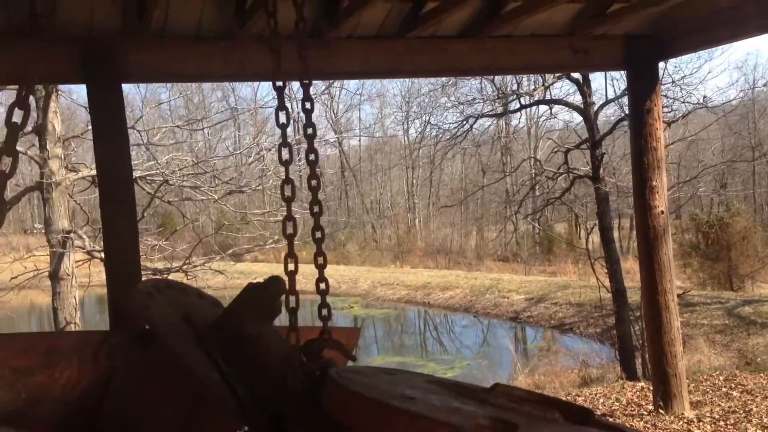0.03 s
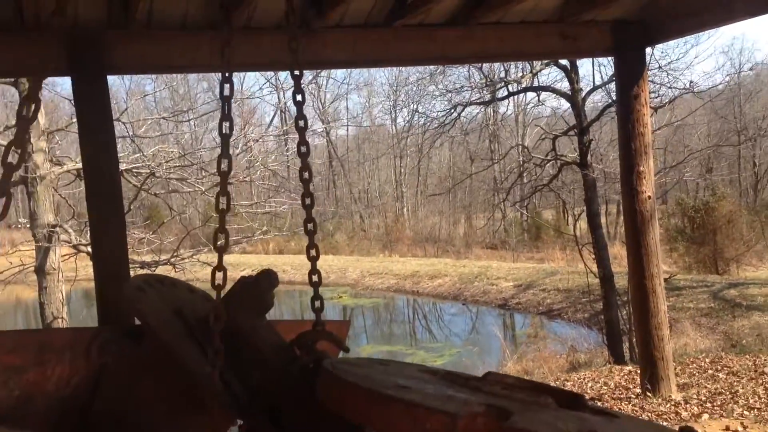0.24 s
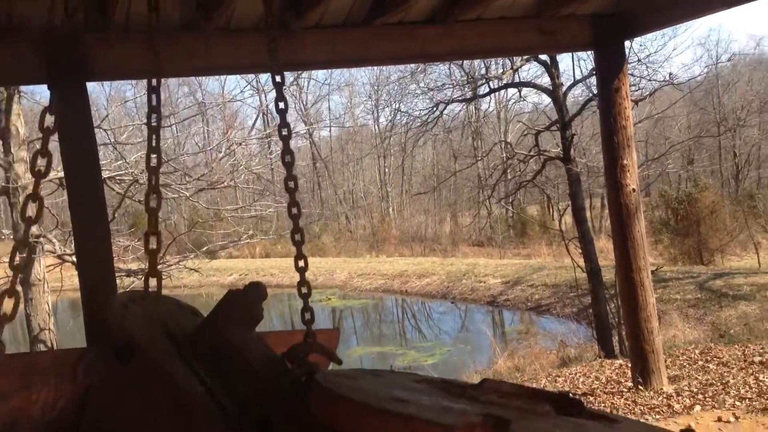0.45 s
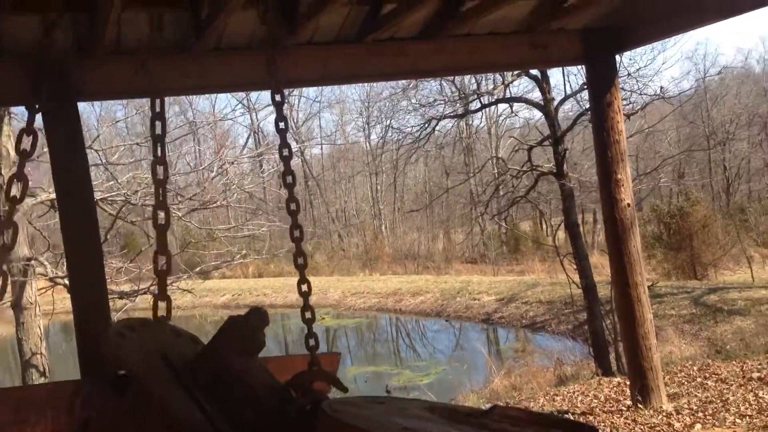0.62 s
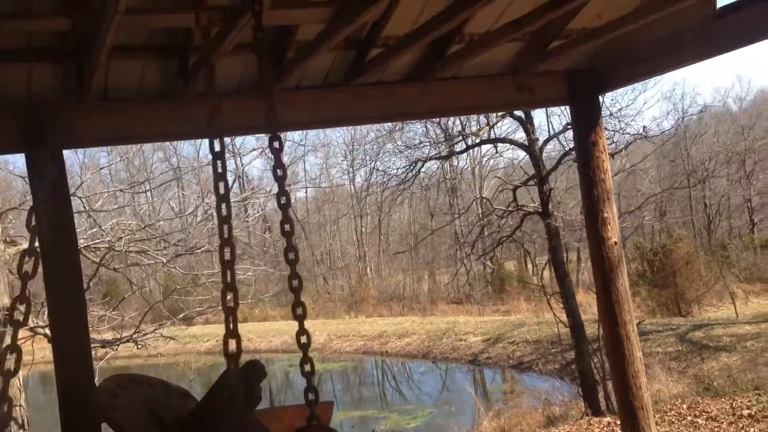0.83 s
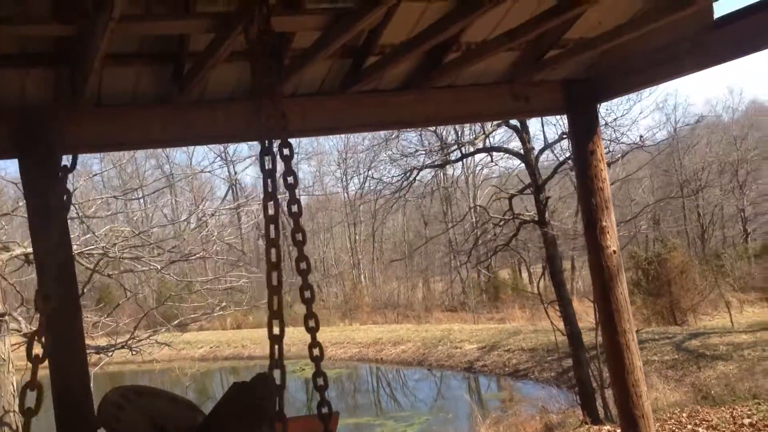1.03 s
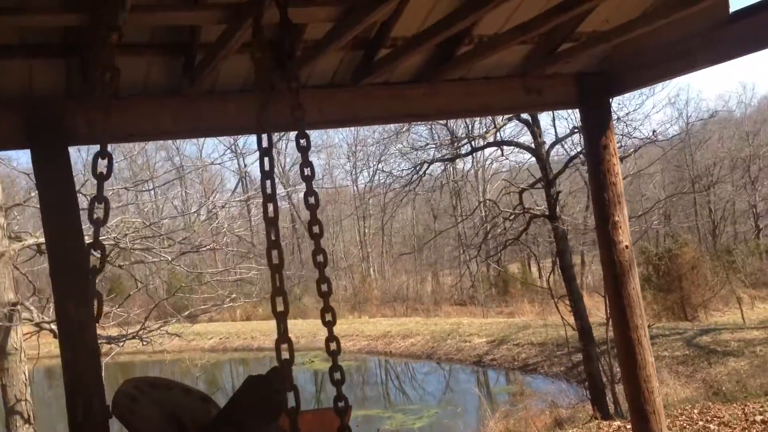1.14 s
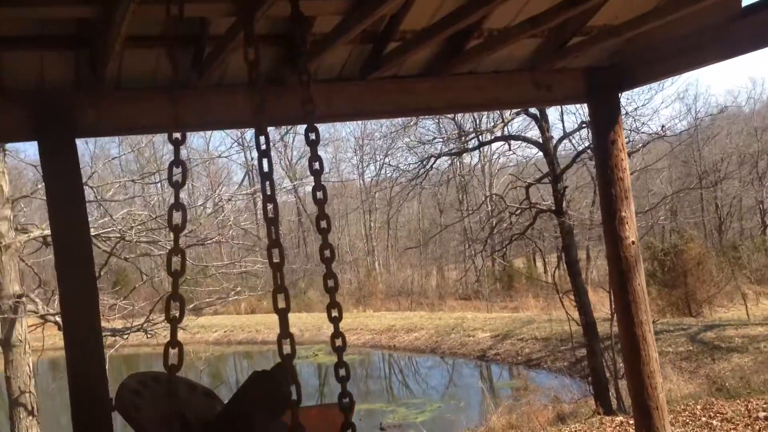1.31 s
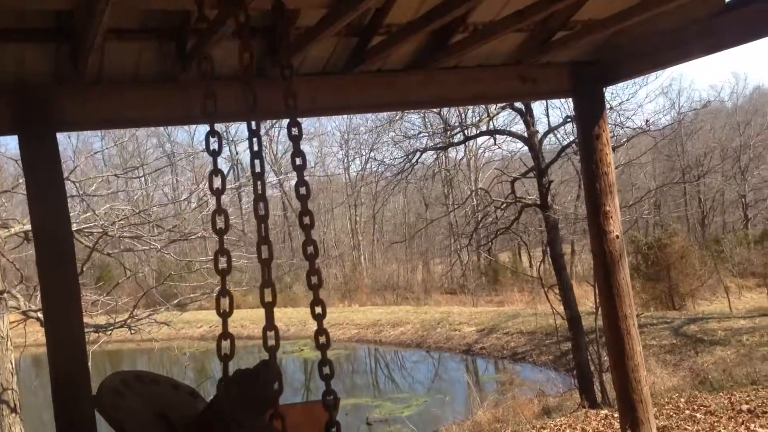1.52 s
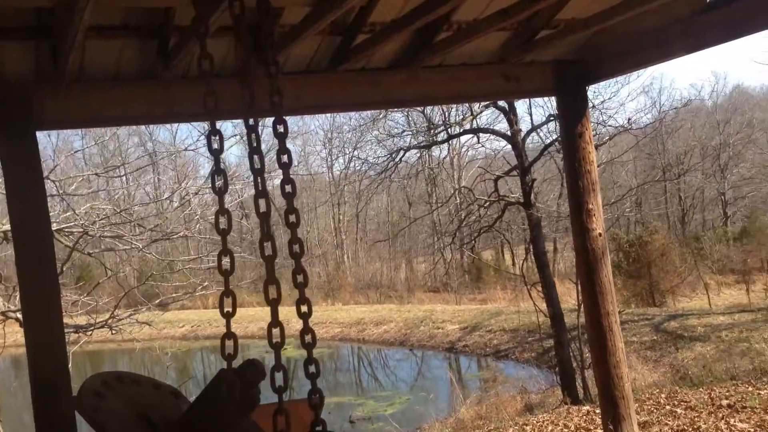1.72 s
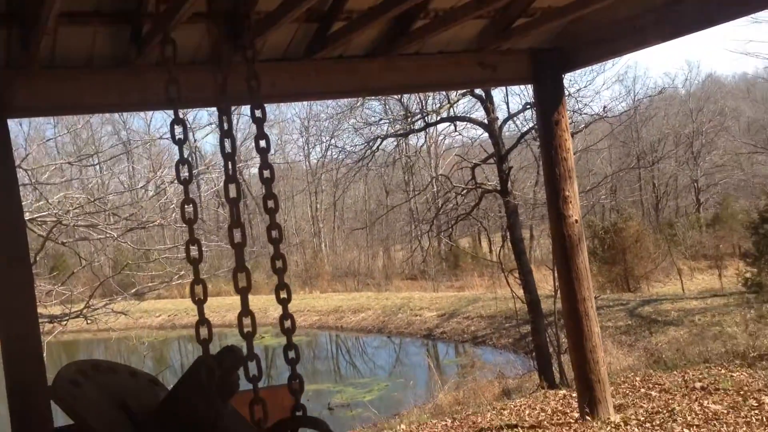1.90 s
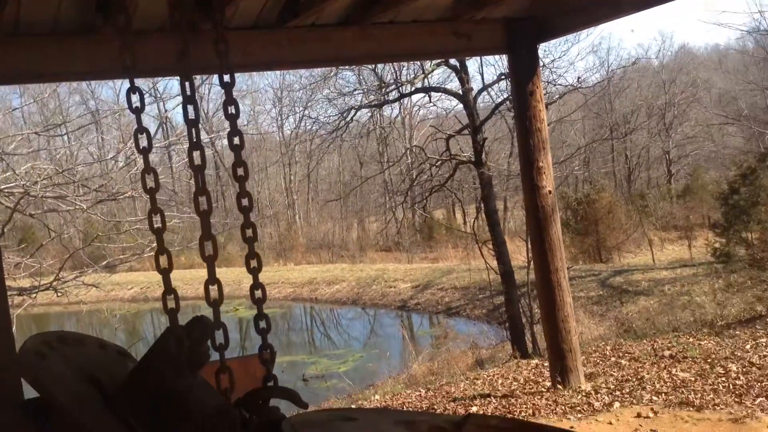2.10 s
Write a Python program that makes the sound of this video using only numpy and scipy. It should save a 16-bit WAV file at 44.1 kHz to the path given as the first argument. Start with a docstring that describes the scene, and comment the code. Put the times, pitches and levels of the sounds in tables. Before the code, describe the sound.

A hand chain winch is pulled once: steel links rattle fast and bright with gritty crackle and hollow clunks, one hard clunk ends it, then sparse dry clacks. Close, mono, under an open shed with short reverberation.

```python
"""A hand chain winch lowers a heavy blade under an open shed, over a low rumble and quiet air.
One quick pull: links rattle and click (ringing modes plus dense noise, spread by chattering
contacts), grit crackles and the loaded mechanism clunks, while the hanging load rumbles on.
As it settles, a dull thump (short sine pulses) is followed by dry clacks of the pawl and a soft scrape.
The shed answers the metal with a decaying wash of noise."""
import sys
import numpy as np
from scipy import signal
from scipy.fft import rfft, irfft, next_fast_len
from scipy.io import wavfile
from scipy.ndimage import uniform_filter1d

SR = 44100
rng = np.random.default_rng(int(sys.argv[2]) if len(sys.argv) > 2 else 0)


def to_wav(sig):
    """Store sig (one row per channel, or 1-D mono) as 16-bit WAV at the path in sys.argv[1].

    Samples outside -1..1 are clipped; the rate is SR.
    """
    pcm = np.clip(np.atleast_2d(sig), -1, 1) * 32767
    pcm = np.round(pcm).astype(np.int16)
    wavfile.write(sys.argv[1], SR, pcm.T)  # frames by channels


N = 94815
T = np.arange(N) / SR

# Spectrum of the quiet outdoor air: frequency_hz, level_db
AIR_SPECTRUM = [(30, -6), (200, -5), (500, -10.5), (1200, -13.5), (4000, -11), (9000, -15), (15000, -17.5)]
AIR_DB = -64.5

# Rumble of the hanging load: time_s, deep_bass_level_db, upper_bass_level_db
RUMBLE_LEVELS = [(0, -66, -38), (.08, -61, -84), (0.109, -64, -53), (.21, -50, -83), (0.249, -34.5, -38.5),
                 (.3, -35.5, -32), (.35, -46, -43), (0.379, -30.5, -42), (.42, -40.5, -49), (.6, -43, -38),
                 (.78, -59, -33.5), (.87, -49, -39), (1.02, -46.5, -39.5), (1.199, -50.5, -41.5),
                 (1.352, -54, -48.5), (1.551, -52, -58), (1.62, -65, -58.5), (1.78, -59.5, -63),
                 (1.83, -46.5, -56), (1.92, -61, -69), (2.15, -51, -62.5)]
# Spectrum of the deep bass: frequency_hz, level_db
DEEP_SPECTRUM = [(20, -26.5), (40, -8.5), (65, 2.5), (95, -2.5), (140, -17.5), (300, -44)]
# Spectrum of the upper bass: frequency_hz, level_db
UPPER_SPECTRUM = [(60, -20), (120, 4), (170, 1), (230, -8), (380, -14), (600, -29), (1200, -35.5),
                  (4000, -62)]

# Running chain between the strikes: time_s, level_db
RUN_LEVELS = [(0, -51.5), (.06, -79), (.11, -72), (.2, -77.5), (.26, -44), (.31, -42.5), (.37, -38),
              (.55, -32.5), (.64, -36.5), (.71, -35.5), (.75, -39.5), (.92, -41.5), (.99, -46.5),
              (1.03, -55.5), (1.085, -44), (1.115, -59.5), (1.24, -76)]
RUN_PER_S, RUN_TILT_DB_PER_OCTAVE, RUN_SPREAD_DB = 640, -1.3, 5
RUN_LINKS = 4  # different links that share the jingles

# Dull low pulses: centre_s, level_db, pitch_hz, length_s
THUMPS = [(.003, -29, 105, .0035), (.9625, -26, 300, .0011), (.9625, -24, 85, .004)]

# Links striking the wheel: start_s, level_db, chatter_s, brightness_db_per_octave
LINK_STRIKES = [(.022, -53, 0.011, -5.5), (0.0409, -48, 0.0038, -8), (0.21, -49, 0.009, -1.5),
                (0.216, -41, 0.015, -6.5), (0.236, -28, 0.0066, -5), (0.242, -27, 0.0054, 8),
                (0.314, -36.5, 0.0077, -3), (.336, -22.5, 0.01, -6), (0.348, -19, 0.0048, 2.5),
                (0.401, -23.5, 0.0089, 5), (0.4142, -15, 0.003, 1), (.439, -29, 0.0014, 9.5),
                (0.461, -23.5, 0.0033, 2.5), (0.4683, -16, 0.0025, 1), (.495, -26, 0.0086, 4.5),
                (0.505, -21, 0.015, 4.5), (.5235, -16.5, 0.0013, 2), (0.559, -25, 0.0047, 5),
                (0.574, -20, 0.01, -4.5), (0.5903, -17, 0.0013, 1.5), (.65, -30.5, 0.009, 0.5),
                (0.669, -21.5, 0.0054, 5), (0.69, -24.5, 0.0031, 6), (0.764, -28, 0.018, -3.5),
                (.86, -32.5, 0.0066, -0.5), (.881, -35, 0.0043, -9), (.894, -34, 0.0018, -5),
                (.936, -38, 0.0081, -16.5), (0.953, -34, 0.0062, 5.5), (0.969, -39, 0.0032, -3.5),
                (1.056, -42, .004, -5), (1.073, -50, 0.0051, -7), (1.082, -43, 0.0048, -9.5),
                (1.17, -47.5, 0.0031, -7.5)]
# Modes of the links: frequency_hz, level_db, t60_s
LINK_MODES = [(2800, -11, .06), (3010, -15, .06), (3440, -4, .08), (3535, -2, .08), (3690, -6, .075),
              (3895, -2, .08), (3975, -1, .07), (4490, 1, .07), (5190, -7, .07), (5890, -11, .08),
              (6310, -12, .08), (6715, -3, .07), (7140, -12, .08), (7980, -7, .07), (8350, -18, .06),
              (9490, -20, .055), (10750, -18, .04), (12150, -24, .05)]
# Spectrum of the links' contact noise: frequency_hz, level_db
LINK_CRACK_SPECTRUM = [(300, -37), (1000, -19), (2200, -6), (2800, -1.5), (3150, -3.5), (3600, 7.5),
                       (4700, -5), (7800, -8.5), (9000, -18.5), (11000, -26), (15000, -33.5)]
LINK_CRACK_DB, LINK_CRACK_T60_S = -3.5, 0.078
LINK_DETUNE, LINK_SCATTER_DB = 0.005, 4  # detune as a fraction of the frequency

# Links that ring on mostly in one mode: start_s, level_db, chatter_s, pitch_hz
LINK_PINGS = [(.038, -48.5, 0.0044, 3980), (.86, -29.5, 0.0095, 4477), (.862, -31, .005, 3460),
              (.94, -38.5, 0.01, 3470), (.972, -44, .008, 3930), (1.057, -37.5, 0.0068, 3390),
              (1.08, -38.5, .005, 3440)]
PING_T60_S = 0.05

# Fine crackle of grit between the links: start_s, length_s, level_db
GRIT_CLUSTERS = [(0.241, .012, -39), (0.25, 0.034, -32.5), (0.364, 0.073, -31), (0.427, 0.013, -33),
                 (0.495, 0.0054, -40), (1.985, 0.0041, -57.5), (2.005, 0.011, -49)]
# Spectrum of the grit: frequency_hz, level_db
GRIT_SPECTRUM = [(1000, -26), (3500, 0), (6000, 3), (10000, -5), (15000, -9.5)]
GRIT_PER_S, GRIT_SPREAD_DB = 830, 6

# Blows on the winch body: start_s, level_db, chatter_s, brightness_db_per_octave
BODY_BLOWS = [(.242, -18, 0.0053, -1), (.350, -24, 0.0052, -1), (.366, -21, 0.014, -2.5),
              (.418, -21.5, 0.017, -5), (.436, -23, 0.016, -4), (.49, -30.5, 0.015, -5.5),
              (.545, -20, 0.0046, -5), (.562, -21.5, 0.011, -6.5), (.583, -21.5, 0.015, -1),
              (0.7834, -11.5, 0.0034, 1.5), (.797, -21.5, 0.0032, -1), (.802, -20.5, 0.0025, -2.5),
              (0.8098, -23.5, .0015, -1), (.82, -28, 0.0038, -5.5), (.87, -47, 0.02, -1),
              (.965, -43.5, 0.014, 7.5), (1.058, -43.5, 0.018, 9), (1.123, -50, 0.0057, -14)]
# Modes of the winch body: frequency_hz, level_db, t60_s
BODY_MODES = [(316, -20, .3), (422, -16, .2), (518, -10, .24), (636, -7, .2), (750, -3, .2), (920, -3, .14),
              (998, -5, .14), (1037, -2, .14), (1166, 4, .13), (1350, -7, .1), (1660, -4, .08),
              (1736, -2, .09), (1812, 1, .085), (1922, -6, .08), (2385, -4, .075), (2918, 3, .07),
              (3570, -5, .08)]
# Spectrum of the body's dense, short ring: frequency_hz, level_db
BODY_CRACK_SPECTRUM = [(100, -23), (350, -0.5), (800, -1.5), (1200, -3), (1450, 0), (1780, 1), (2100, -4),
                       (2400, 0), (3000, -1), (5000, -10.5), (8000, -21), (15000, -41)]
BODY_CRACK_DB, BODY_CRACK_T60_S = 1.5, 0.18

# Clacks of the pawl: start_s, level_db, brightness_db_per_octave, frame_ring_level_db
PAWL_CLACKS = [(1.7235, -25.5, 0.5, -62), (1.7473, -32, -4.5, -57.5), (1.954, -50, -14, -64),
               (2.0177, -38.5, -5, -37)]
# Modes of the pawl: frequency_hz, level_db, t60_s
PAWL_MODES = [(1050, -15, .16), (1215, -5, .11), (1620, -6, .11), (1981, -10, .14), (2487, 6, .085),
              (2640, 3, .06), (3112, -7, .09), (3975, 0, .09), (4220, 0, .07), (4603, 0, .08),
              (5260, -2, .07)]
# Spectrum of the pawl's snap: frequency_hz, level_db
PAWL_CRACK_SPECTRUM = [(150, -31.5), (600, -29.5), (1100, -7.5), (2000, -4.5), (2600, 5), (3300, -0.5),
                       (4200, -1.5), (6000, -3), (9000, -6.5), (15000, -22)]
PAWL_CRACK_DB, PAWL_CRACK_T60_S = 0, 0.13
PAWL_CONTACT_S, PAWL_RISE_S, FRAME_DELAY_S = 0.00161, 0.00045, 0.0035
# Modes of the frame that holds the pawl: frequency_hz, level_db, t60_s
FRAME_MODES = [(497, -6, .2), (565, -13, .17), (1335, -6, .15), (1513, -12, .18), (1707, 0, .085),
               (2545, 2, .065), (2900, -4, .07), (3950, 2, .06), (5491, -2, .06)]

# The pawl drags up a tooth before it drops: peak_s, rise_s, fall_s, level_db
DRAG_SWELL = (1.96, .032, .018, -55)
# Spectrum of the drag: frequency_hz, level_db
DRAG_SPECTRUM = [(300, -5), (900, -3), (1400, 0.5), (2600, -6), (4000, -17.5), (9000, -37)]

DAMPING = 0.52  # t60 falls with frequency to this power
SHED_DB, SHED_T60_S = -14, 0.35
TOP_HZ = 15300


def amp(db):
    """Logarithmic level: decibels to a linear gain."""
    return 10 ** (np.asarray(db) / 20)


def unit(x):
    """Energy normalisation: scale to a sum of squares of one."""
    return x / np.sqrt(np.sum(x ** 2))


def add(out, start, x, db):
    """Superposition: mix in a blow; its level is that of its energy spread over 10 ms."""
    i = max(int(start * SR), 0)
    blow = unit(x) * amp(db) * np.sqrt(SR / 100)
    out[i:i + len(x)] += blow[:N - i]


def colour(x, points, tilt=0):
    """Minimum-phase filtering: a causal filter through (Hz, dB) points, tilted in dB per octave."""
    size = next_fast_len(len(x) + 2048, True) // 2 * 2
    octave = np.log2(np.maximum(np.fft.rfftfreq(size, 1 / SR), 10))
    hz, db = np.array(points).T
    # the tilt pivots at 1 kHz and levels off below 500 Hz and above 16 kHz
    slope = tilt * np.clip(octave - np.log2(1000), -1, 4)
    gain = amp(np.interp(octave, np.log2(hz), db) + slope)
    # folding the cepstrum onto positive time makes the filter causal
    cepstrum = irfft(np.log(gain))
    cepstrum[1:size // 2] *= 2
    cepstrum[size // 2 + 1:] = 0
    response = np.exp(rfft(cepstrum))
    return irfft(rfft(x, size) * response)[:len(x)]


def ring(modes, tilt=0, detune=0, scatter_db=0, size=16000):
    """Modal synthesis: a sum of decaying sines, drawn a little differently at every blow."""
    hz, db, t60 = np.array(modes).T[:, :, None]
    level_draw, pitch_draw, phase_cycles = rng.standard_normal((3, len(modes), 1))
    gain = amp(db + scatter_db * level_draw + tilt * np.log2(hz / 1000))
    decay = np.exp(-np.log(1000) * T[:size] / t60)
    cycles = hz * (1 + detune * pitch_draw) * T[:size] + phase_cycles
    return unit(np.sum(gain * decay * np.sin(2 * np.pi * cycles), axis=0))


def wash(t60, size=16000):
    """High modal density: countless close modes as noise whose treble dies first (t60 at 1 kHz)."""
    noise, out = rfft(rng.standard_normal(size)), 0
    octave = np.clip(np.log2(np.fft.rfftfreq(size, 1 / SR) / 1000 + 1e-9), -3, 4)
    for k in range(-3, 5):  # overlapping octave bands around 1 kHz
        band = irfft(noise * np.maximum(1 - abs(octave - k), 0))
        out = out + band * np.exp(-np.log(1000) * T[:size] * 2 ** (k * DAMPING) / t60)
    return out


def crack(t60, spectrum, tilt):
    """Dense modal response: the coloured noise of one blow, at unit energy."""
    return unit(colour(wash(t60), spectrum, tilt))


def chatter(x, seconds, rise_s=0.0011, size=2600):
    """Repeated impact: a volley of steel contacts builds quickly, dies away and favours no pitch."""
    envelope = np.exp(-T[:size] / seconds) * (1 - np.exp(-T[:size] / rise_s))
    volley = rng.standard_normal(size) * envelope
    for _ in range(3):  # alternately flatten the spectrum and restore the envelope
        spectrum = rfft(volley, 2 * size)
        volley = irfft(spectrum / (abs(spectrum) + 1e-9))[:size]
        volley *= envelope / np.sqrt(uniform_filter1d(volley ** 2, size=120) + 1e-12)
    return signal.fftconvolve(x, volley)


def outdoor_air():
    """Stationary broadband noise: quiet outdoor air at a constant level."""
    air = colour(rng.standard_normal(N), AIR_SPECTRUM)
    return amp(AIR_DB) * air / air.std()


def load_rumble():
    """Band-limited noise: the load and beam rumble in two bass bands with separate level curves."""
    out = np.zeros(N)
    times, deep_db, upper_db = np.array(RUMBLE_LEVELS).T
    for spectrum, curve in (DEEP_SPECTRUM, deep_db), (UPPER_SPECTRUM, upper_db):
        rumble = colour(rng.standard_normal(N), spectrum)
        out += rumble / rumble.std() * amp(np.interp(T, times, curve))
    return out


def link(tilt):
    """Modal and dense response together: the ring and contact noise of one link."""
    noise = crack(LINK_CRACK_T60_S, LINK_CRACK_SPECTRUM, tilt)
    return ring(LINK_MODES, tilt, LINK_DETUNE, LINK_SCATTER_DB) + amp(LINK_CRACK_DB) * noise


def running_chain():
    """Random impact train: small jingles of the links fill the time between the strikes."""
    run = np.zeros(N)
    for _ in range(RUN_LINKS):
        hits = rng.random(N) < RUN_PER_S / RUN_LINKS / SR
        ticks = hits * amp(RUN_SPREAD_DB * rng.standard_normal(N))
        run += signal.fftconvolve(ticks, link(RUN_TILT_DB_PER_OCTAVE))[:N]
    return run / run.std() * amp(np.interp(T, *np.array(RUN_LEVELS).T))


def dull_thumps():
    """Short tone pulse: a sine under a hyperbolic-secant envelope spreads its energy over the bass."""
    out = np.zeros(N)
    for centre, db, hz, seconds in THUMPS:
        time = T - centre
        envelope = 1 / np.cosh(np.clip(time / seconds, -20, 20))
        add(out, 0, np.sin(2 * np.pi * hz * time) * envelope, db)
    return out


def link_strikes():
    """Impact excitation: links strike the wheel through chattering contacts; a few ring on."""
    out = np.zeros(N)
    for start, db, seconds, tilt in LINK_STRIKES:
        add(out, start, chatter(link(tilt), seconds), db)
    for start, db, seconds, hz in LINK_PINGS:
        add(out, start, chatter(ring([(hz, 0, PING_T60_S)]), seconds), db)
    return out


def grit(size=3000):
    """Random pulse train: tiny, bright, dry cracks in clusters of at most 68 ms."""
    out = np.zeros(N)
    for start, seconds, db in GRIT_CLUSTERS:
        chance = rng.random(size)
        chance[0] = 0  # every cluster opens with a crack
        hits = (chance < GRIT_PER_S / SR) * (T[:size] < seconds)
        ticks = hits * amp(GRIT_SPREAD_DB * rng.standard_normal(size))
        add(out, start, colour(ticks, GRIT_SPECTRUM), db)
    return out


def winch_clunks():
    """Struck-body resonance: the loaded mechanism clunks as the chain shifts."""
    out = np.zeros(N)
    for start, db, seconds, tilt in BODY_BLOWS:
        noise = crack(BODY_CRACK_T60_S, BODY_CRACK_SPECTRUM, tilt)
        body = ring(BODY_MODES, tilt, scatter_db=1) + amp(BODY_CRACK_DB) * noise
        add(out, start, chatter(body, seconds), db)
    return out


def pawl_clacks():
    """Coupled resonance: dry clacks of the pawl leave its frame ringing faintly a moment later."""
    out = np.zeros(N)
    for start, db, tilt, frame_db in PAWL_CLACKS:
        snap = crack(PAWL_CRACK_T60_S, PAWL_CRACK_SPECTRUM, tilt)
        body = ring(PAWL_MODES, tilt, detune=0.0109, scatter_db=-2.5) + amp(PAWL_CRACK_DB) * snap
        add(out, start, chatter(body, PAWL_CONTACT_S, PAWL_RISE_S), db)
        add(out, start + FRAME_DELAY_S, ring(FRAME_MODES), frame_db)
    return out


def pawl_drag():
    """Friction noise: a soft scrape that swells and fades exponentially."""
    peak, rise, fall, db = DRAG_SWELL
    rub = colour(rng.standard_normal(N), DRAG_SPECTRUM)
    swell = np.exp(-np.maximum((peak - T) / rise, (T - peak) / fall))
    return rub / rub.std() * amp(db) * swell


def shed_reverberation(metal):
    """Diffuse reverberation: convolution with a decaying wash of noise stands for the shed."""
    response = unit(wash(SHED_T60_S, size=30000))
    return amp(SHED_DB) * signal.fftconvolve(metal, response)[:N]


def scene():
    """Linear superposition: the winch, its reverberation, the load and the air on one channel."""
    metal = link_strikes() + running_chain() + winch_clunks() + pawl_clacks() + pawl_drag()
    reverberation = shed_reverberation(metal)
    unreflected = outdoor_air() + grit() + load_rumble() + dull_thumps()
    return (metal + reverberation + unreflected)[None]


def record(dry):
    """Band limitation: a steep elliptic low-pass removes the top of the treble."""
    low_pass = signal.ellip(10, .2, 80, TOP_HZ, fs=SR, output="sos")
    return signal.sosfilt(low_pass, dry)


dry = scene()
out = record(dry)
to_wav(out)
```